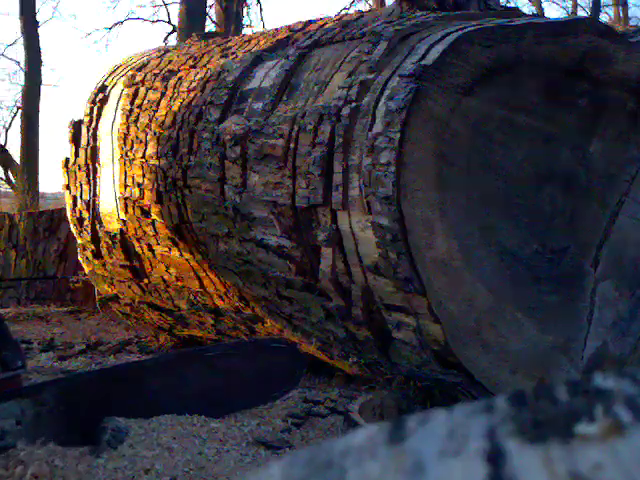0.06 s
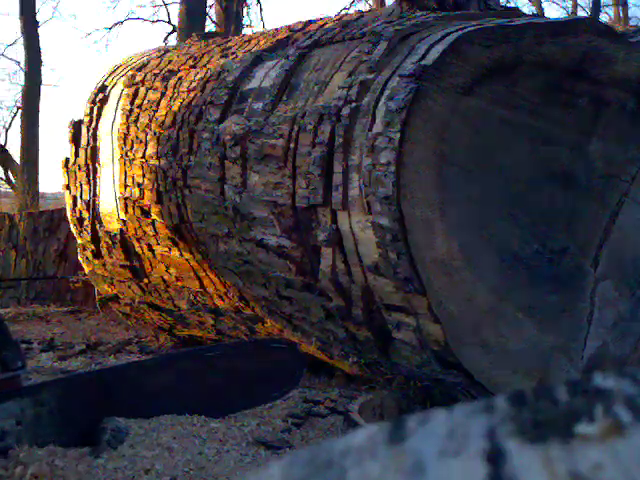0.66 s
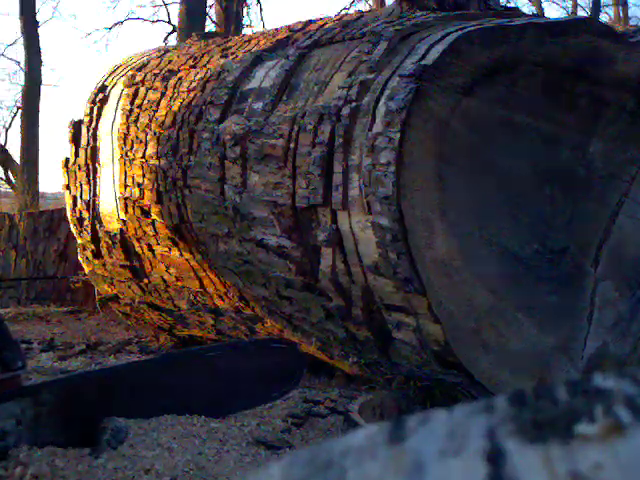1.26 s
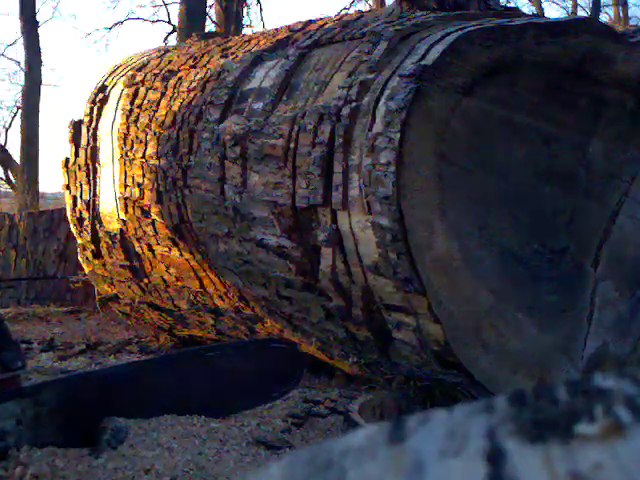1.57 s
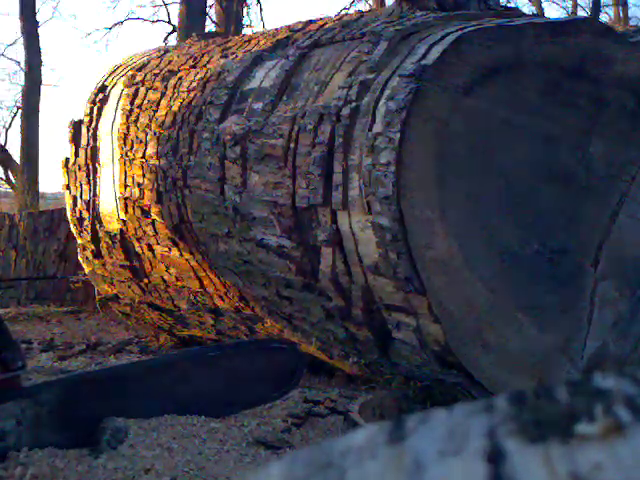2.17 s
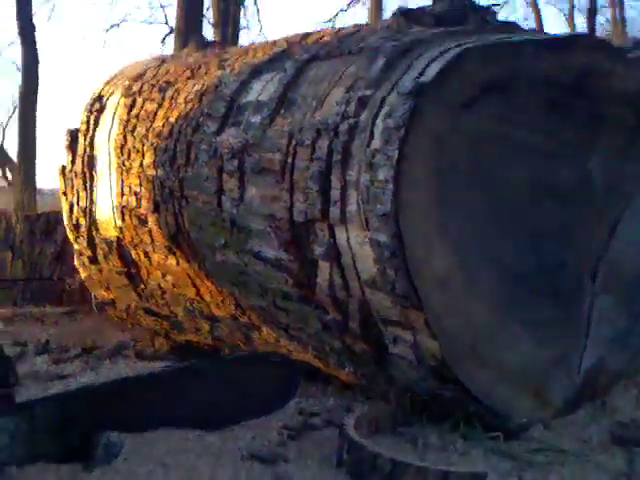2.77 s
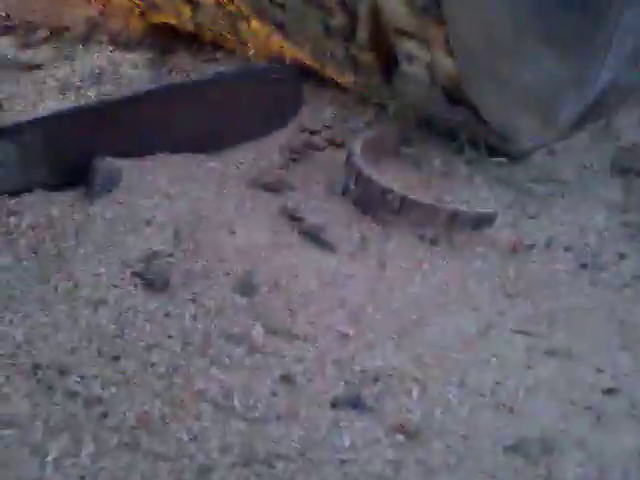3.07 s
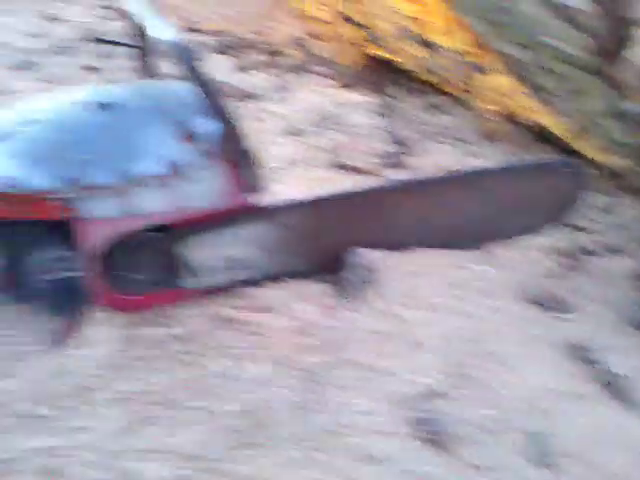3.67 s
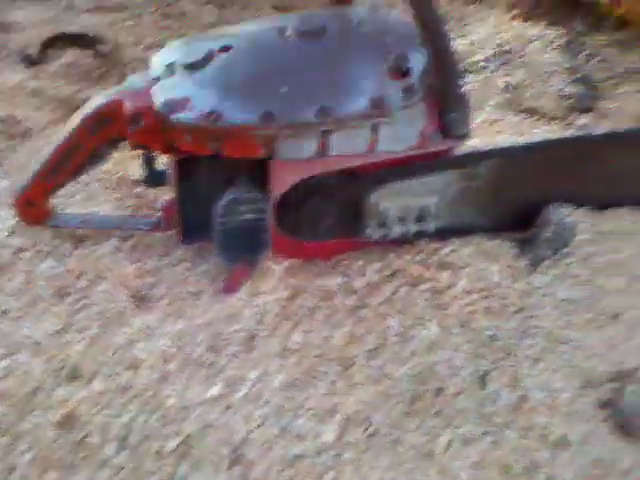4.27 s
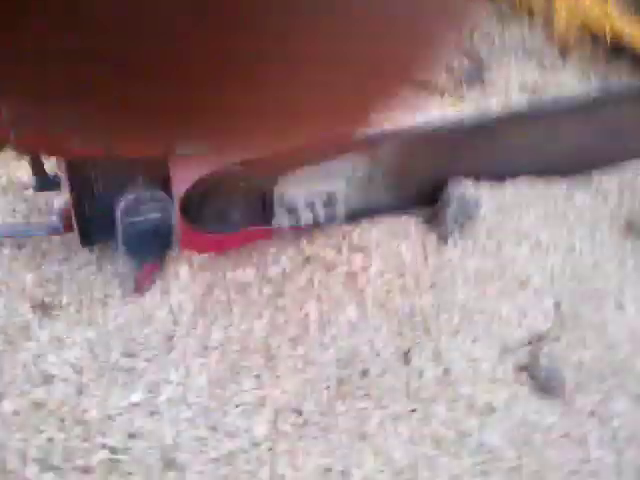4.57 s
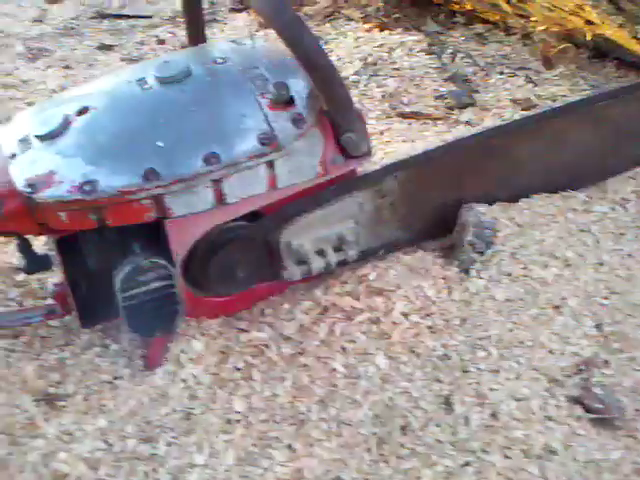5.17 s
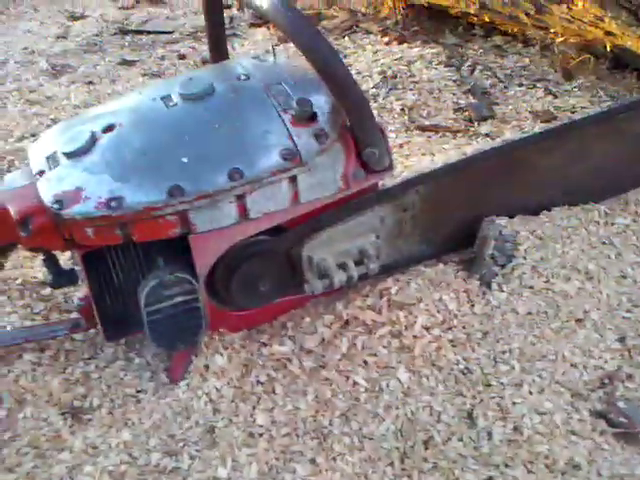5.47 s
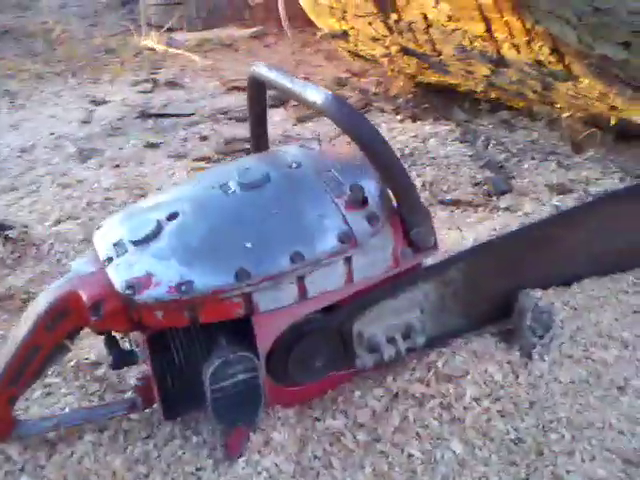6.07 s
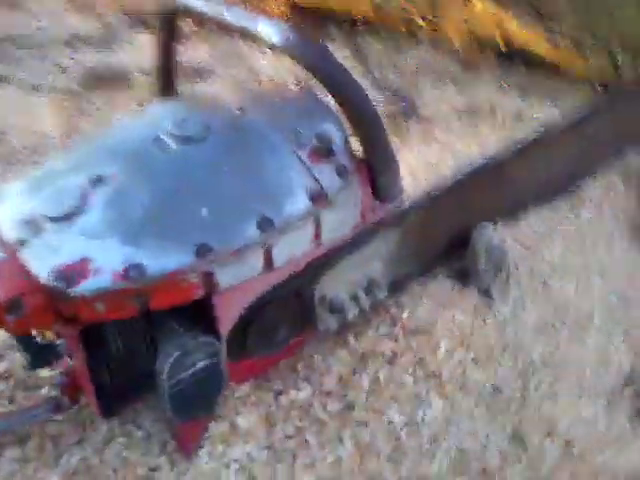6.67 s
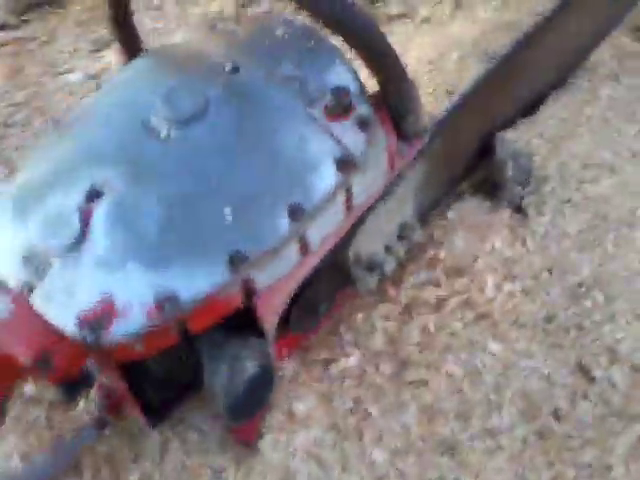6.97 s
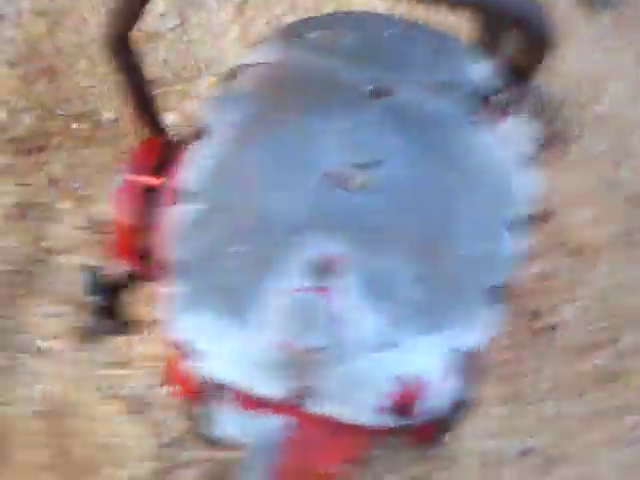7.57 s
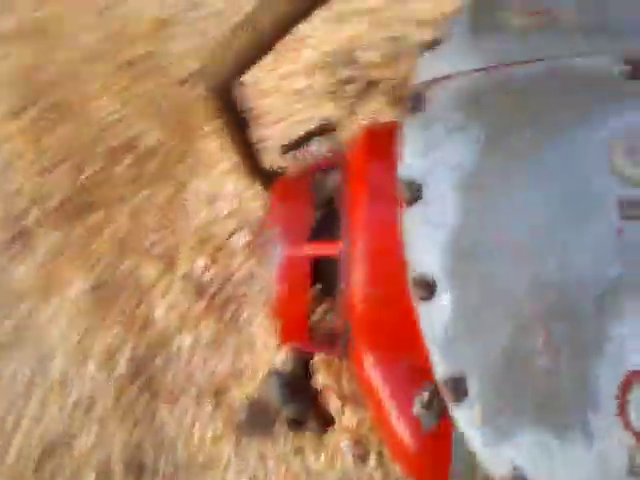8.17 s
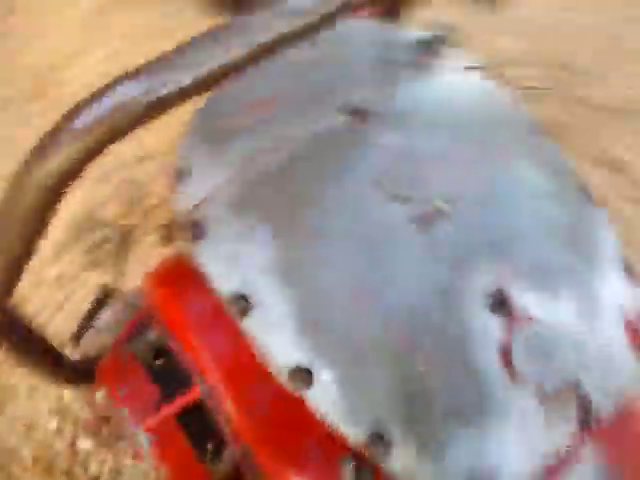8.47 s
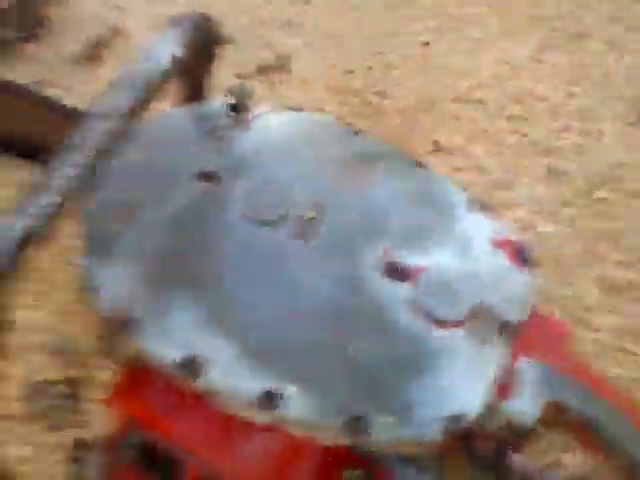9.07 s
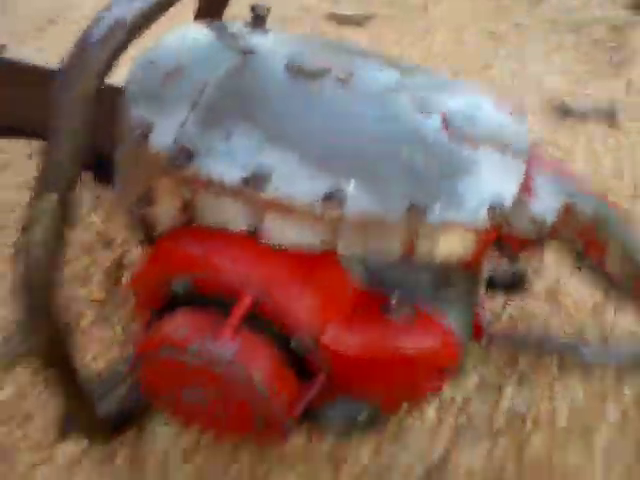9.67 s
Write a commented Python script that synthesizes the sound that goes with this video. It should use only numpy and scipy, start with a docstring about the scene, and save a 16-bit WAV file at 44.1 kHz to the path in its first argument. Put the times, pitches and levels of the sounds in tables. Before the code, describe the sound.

A small two-stroke chainsaw idles outdoors the whole time, a rapid, slightly uneven putter with sharp exhaust cracks and occasional low thuds. A light hiss of chain and cooling air runs between the beats. The hand-held microphone starts with the engine to the left, then moves closer, so the exhaust barks louder and the chain sizzles faintly. Near the end the cracks fade and the engine sounds boomier and hollower.

```python
"""Old chainsaw idling

A two-stroke saw idles on sawdust beside a log while a hand-held mic moves in and over it.
Every turn of the crank fires a bark and a puff out of the muffler; strong and weak burns tend to
alternate, and the hardest crack and thud. Fan and chain hiss between the beats, and the mic's
two close ports are cross-fed into wide stereo."""
import sys
import numpy as np
from scipy import signal
from scipy.fft import rfft, irfft
from scipy.io import wavfile
from scipy.ndimage import uniform_filter1d

SR = 44100
rng = np.random.default_rng(int(sys.argv[2]) if len(sys.argv) > 2 else 0)


def dump(signal):
    """Clip the signal to [-1, 1] and save it as 16-bit WAV at the path in sys.argv[1]."""
    limited = np.clip(np.atleast_2d(signal).T, -1, 1)
    pcm = np.round(limited * 32767).astype(np.int16)
    wavfile.write(sys.argv[1], SR, pcm)


N = 437472
TIME = np.arange(N) / SR

# Table levels are fader rides; each layer adds its own trim.
# the wandering idle: time_s, crank_hz
CRANK_SPEED = [(0, 41.81), (.57, 42.05), (.74, 42.52), (.98, 43.76), (1.38, 43.98), (1.6, 43.33),
               (1.86, 44.69), (2.31, 42.52), (2.65, 44.06), (3.38, 43.95), (3.52, 43.46), (3.78, 44.4),
               (4.02, 44.16), (4.55, 45.64), (4.82, 45.58), (5.01, 45.16), (5.3, 45.66), (5.62, 45.56),
               (5.78, 46.24), (6.22, 45.45), (6.4, 46.08), (6.74, 46.4), (7.14, 46.37), (7.3, 46.95),
               (7.46, 45.44), (7.7, 45.97), (8.02, 45.4), (8.26, 45.48), (9.01, 46.74), (9.46, 46.24),
               (9.62, 46.84), (9.92, 46)]
# the hardest firings: time_s, strength_db, crack_db
BANGS = [(.063, 11.5, -22.5), (.255, 7, -21), (.303, 9, -19.5), (.373, 11, -18), (.492, 10, -17),
         (.516, 12.5, -21), (.565, 6.5, -21), (.636, 11, -23), (.682, 7.5, -22), (.846, 13, -24),
         (.915, 11.5, -18), (.961, 4, -18), (.985, 11.5, -20), (1.031, 10.5, -19), (1.098, 14, -15.5),
         (1.212, 11.5, -17), (1.257, 10, -19), (1.304, 9, -21), (1.327, 5, -24), (1.44, 10, -23),
         (1.509, 5.5, -18.5), (1.577, 11, -21.5), (1.623, 11, -21), (1.694, 9.5, -24), (1.783, 8, -24),
         (1.85, 12.5, -18), (1.897, 6, -21.5), (1.987, 6.5, -23), (2.123, 11, -19), (2.193, 10.5, -26),
         (2.287, 11.5, -20.5), (2.332, 11, -21.5), (2.402, 10.5, -15), (2.495, 11, -14), (2.541, 11, -15),
         (2.655, 10.5, -17), (2.792, 8, -21.5), (2.837, 6, -19.5), (2.882, 10, -21), (2.971, 8.5, -22),
         (3.155, 10.5, -19), (3.201, 12, -20), (3.27, 7.5, -21.5), (3.407, 6.5, -16.5), (3.451, 10.5, -17),
         (3.634, 9, -17), (3.816, 7.5, -20), (4.019, 5, -18), (4.199, 7, -18), (4.266, 7, -21),
         (4.355, 6.5, -20), (4.399, 5.5, -19), (4.53, 5.5, -22), (4.598, 2.5, -20), (4.794, 6, -12.5),
         (4.883, 4, -20.5), (5.236, 4, -18), (5.323, 1.5, -13), (5.542, 4.5, -23), (5.652, 4.5, -13.5),
         (5.717, 4.5, -22), (5.825, 5, -18), (6.109, 7, -13), (6.241, 6, -16.5), (6.372, 6.5, -24),
         (6.566, 4, -19), (6.652, 5.5, -24), (6.695, 5.5, -16.5), (6.739, 4.5, -18), (6.782, 5, -14.5),
         (6.912, 5, -18), (7.019, 4.5, -14.5), (7.128, 0, -12), (7.192, 6.5, -23), (7.256, 6.5, -18.5),
         (7.299, 5.5, -22), (7.364, 5, -19.5), (7.429, 7, -27), (7.472, 7.5, -26), (7.538, 7, -21),
         (7.604, 12, -18.5), (7.691, 8.5, -26), (7.736, 5, -30), (7.757, 10.5, -23), (8.041, 6.5, -27),
         (8.196, 7, -34), (8.35, 8, -41), (8.481, 10.5, -34), (8.525, 6.5, -32), (8.612, 7, -38),
         (8.956, 7.5, -32), (9.623, 7, -37), (9.751, 7.5, -41)]
# blasts that overload the mic: time_s, level_db
THUDS = [(0.062, -29), (0.372, -28), (0.515, -19), (0.635, -23), (1.097, -25), (1.44, -31), (1.576, -24),
         (1.622, -19), (1.692, -29), (1.848, -28), (1.985, -27), (2.494, -20), (2.54, -27), (2.654, -23),
         (3.155, -27), (3.201, -26), (3.45, -25), (4.354, -28), (4.793, -33), (5.322, -23), (5.541, -30),
         (5.651, -29), (5.716, -32), (6.108, -34), (6.371, -30), (6.695, -26), (6.781, -28), (6.911, -22),
         (7.127, -21)]
# the muffler from the moving mic: time_s, puff_db, bark_db, pan_left_db
EXHAUST = [(0, -25.5, -42, 25), (1.7, -25.5, -39, 23), (2.3, -24.5, -35.5, 17.5), (3.3, -21.5, -31.5, 17),
           (4.05, -18.5, -24, 6), (5.3, -18, -24.5, 10), (6.9, -18.5, -19, 3), (7.3, -21, -19.5, 2),
           (8.25, -22.5, -27, -8.5), (8.9, -22.5, -23.5, -2), (9.55, -20, -23.5, -3.5),
           (9.92, -23, -22.5, -2.5)]
# low end of an ordinary turn: time_s, thump_db, scavenge_db
LOW_END = [(0, -39.5, -32), (2.3, -36.5, -35), (3.2, -35, -38.5), (4.5, -38.5, -34.5), (5.8, -38, -33.5),
           (7.2, -34, -28.5), (7.7, -30, -30.5), (8.1, -25.5, -32.5), (8.55, -30.5, -27),
           (9.0, -31.5, -31.5), (9.92, -30.5, -40)]
# intake hum: crank_harmonic, level_db
HUM_PARTIALS = [(2, -60.5), (3, -47.5), (4, -40)]
# the bed between the beats: time_s, chain_db, fan_db
NOISE_BED = [(0, -37, -42.5), (1.1, -34.5, -40.5), (1.49, -32, -41), (1.74, -36.5, -42.5),
             (2.35, -37.5, -39.5), (2.65, -34, -37.5), (4.1, -31, -35.5), (4.6, -33.5, -38.5),
             (5.6, -33, -35.5), (6.1, -31, -31.5), (6.35, -34, -34.5), (6.95, -32.5, -33.5),
             (7.95, -51.5, -35), (9.92, -41, -34)]
# the guide bar rings out as the mic passes it: peak_s, level_db
BAR_SWELLS = [(4.72, -41), (6.1, -40), (6.8, -42), (7.25, -43)]
# the links sizzle as the mic faces them: peak_s, level_db
SIZZLE_SWELLS = [(3.5, -40), (4.1, -37.5), (4.8, -35.5), (5.35, -30.5), (5.85, -33)]
# how far the mic is over the top cover, which shades the muffler: time_s, share
OVERHEAD = [(0, 0), (5.7, 0.06), (7.0, 0.73), (7.6, 0.34), (8.0, 0.99), (8.4, 0.83), (9.0, 0.3),
            (9.35, 0.38), (9.92, 0)]
# the cover's moving notch: time_s, pitch_hz, depth_share
SHADOW_NOTCH = [(6.3, 1020, 0.1), (7.0, 1020, 0.57), (7.7, 1150, .15), (8.2, 1190, .75), (8.55, 1130, 1),
                (9.0, 1160, 0.44), (9.3, 1290, 1), (9.6, 1320, 0), (9.92, 1380, 0)]
# lag of the left side behind the right: pitch_hz, lag_rad
PORT_LAG = [(25, 12.5), (80, 4.5), (170, 0.55), (300, 1.19), (560, -0.2), (950, 0.13), (1300, 0),
            (1600, 0.5), (1900, 2), (2620, 3), (3150, 4.5), (3900, 5.5), (5250, 10.5)]

# EQ curves, all: pitch_hz, gain_db
BARK_EQ = [(30, -33), (300, -42.5), (880, -10), (1040, 5), (1190, 10), (1380, 2), (1560, -13), (1880, -1.5),
           (2250, -17.5), (2650, -48), (3200, -15), (4300, -20.5), (7000, -76)]  # exhaust port, close up
BARK_OVERHEAD_EQ = [(30, -26), (300, -23), (850, -13.5), (1000, -1.5), (1160, -2.5), (1340, 7.5),
                    (1550, -12), (1850, 0.5), (2250, -8), (2600, -7), (3100, -7.5), (3450, -9), (3700, -15),
                    (4300, -22), (7000, -38.5)]  # from above the cover
BARK_REST_EQ = [(30, -50), (300, -37.5), (880, -3.5), (1010, 4.5), (1120, 6), (1260, -4.5), (1420, -31),
                (1750, -6), (2400, -27), (3300, -8), (7000, -56)]  # from beside the log
PUFF_EQ = [(30, -45.5), (90, -33.5), (280, -17), (410, -4), (520, 1), (640, 1), (760, 0.5), (840, -3.5),
           (930, -19), (1400, -27.5), (3000, -60.5)]  # main push of gas
CAN_EQ = [(30, -99), (500, -25), (690, -3.5), (735, -5.5), (785, -7), (880, -26), (930, -17), (968, -14.5),
          (1010, -29.5), (2000, -66.5)]  # ringing muffler can
THUMP_EQ = [(25, -50), (80, -24.5), (130, -8), (200, 1), (280, 2), (400, 6.5), (470, 2.5), (650, -8),
            (1500, -35)]  # weight of a strong burn
SCAVENGE_EQ = [(25, -47), (80, -32), (130, -11), (190, -2), (250, 4), (340, 0), (450, -5), (900, -40)]  # soft pop of scavenging gas
COVER_EQ = [(25, -63.0), (120, -36), (230, 5.0), (22000, 10.5)]  # low cut on the cover's boom
RASP_EQ = [(800, -32), (1500, 6), (1900, 3), (2300, 5), (2750, -19.5), (3150, -2.5), (4200, -12),
           (5500, -24), (14000, -19)]  # gas in the outlet
CRACK_EQ = [(30, 3), (80, 9), (250, -14), (1000, -5), (2000, 5.5), (3500, 4.5), (5200, 1.5), (7000, 6.5),
            (9000, 10), (11000, 6), (14000, 6)]  # snap of a full burn
THUD_EQ = [(25, -24), (60, -9), (100, 4), (160, 6), (280, 9), (450, -18), (800, -23), (2000, -33)]  # overloaded port
SLAP_EQ = [(100, -67), (1200, -4.5), (1900, -7), (2500, -12.5), (3150, 12.5), (3420, 1.5), (3690, 0.5),
           (3950, -8.5), (4500, -5.5), (6000, -30), (14000, -20)]  # piston on the bore
HISS_EQ = [(1500, -9.5), (2700, -27), (4000, -3), (4600, 0), (5200, -6.5), (6500, 0), (7800, 4.5),
           (9000, 5), (10600, 4.5), (12000, 3.5), (14000, -1)]  # chain in its groove
BAR_EQ = [(4500, -50), (5550, -15), (5880, 0), (6130, 0), (6450, -12), (8000, -50)]  # ringing guide bar
SIZZLE_EQ = [(3900, -36), (4550, 1), (5100, -3), (7000, -22), (8200, -4), (9150, 5), (9600, 1), (10100, -5),
             (10900, -28), (11800, -3), (12300, 2), (12900, -10), (14000, -16)]  # chain links
FAN_EQ = [(25, -4), (60, -2), (130, 0), (220, 4.5), (350, 10), (700, 7), (1300, -0.5), (2000, 3.5),
          (2600, 5.5), (3400, 0), (4400, -8), (6000, -8.5), (14000, -14)]  # cooling air
SIDE_EQ = [(200, -1), (900, -1.5), (1150, -3.5), (1310, -11), (1500, -0.5), (1800, 2), (3400, -1.5),
           (3900, -2), (4400, 0)]  # dips the cross-feed cuts in the stereo difference

SPENT_GAS, BURN_RANGE = .4, (-1.2, .75)  # share of a burn taken off the next; weakest, strongest
IDLE_HZ, BASE_STRENGTH_DB, SWING_DB, SWING_DB_PER_HZ = 45.2, 1.82, 5.5, 0.5
CRACK_DB, CRACK_FALL_DB, CRACK_SPREAD_DB = -23.5, 5.5, 2.5  # base, loss on weaker burns, scatter
POP_EARLY_S_PER_DB = .0006  # a stronger burn pops sooner
# the mic lifts from beside the log, and later crosses to where the saw's body shades the cracks
LIFT_S, CROSS_S, FAR_SIDE_DB = (1.6, 2.4), (7.37, 8.7), -26
# a point on the pan curve: the bark starts far left with the puff, then moves to the middle sooner
PUFF_PAN_REF_DB, BARK_PAN_REF_DB = 11, 2
# the cover's boom: (mic at rest, mic lifted)
COVER_DB, COVER_HZ, COVER_WIDTH_HZ = (-32.5, -48), (333, 378), (39, 98)


def muffler(times, strength_db):
    """The opening port barks; the main puff follows and leaves the can ringing."""
    puff_db, bark_db, _, _ = perspective(times)
    can_db, _, puff_pan, bark_pan = perspective(TIME)
    over = follow(OVERHEAD, TIME)[0]
    lifted = np.interp(TIME, LIFT_S, [0, 1])
    opening = push(times - .0036, bark_db + 0.6 * strength_db + .5, rough=0.25, eddy_s=0.00092)
    bark = colour(opening * lifted * np.sqrt(1 - over), BARK_EQ)
    bark += colour(opening * lifted * np.sqrt(over), BARK_OVERHEAD_EQ)
    bark += colour(opening * (1 - lifted) * amp(6.5), BARK_REST_EQ)
    blow = push(times - .0016, puff_db + 0.49 * strength_db + 1.24, rough=0.15, eddy_s=0.0034)
    puff = colour(blow, PUFF_EQ) * amp(-1.0)
    can = colour(blow * amp(1.03 * can_db + 8.0), CAN_EQ)
    return place(bark, bark_pan) + place(puff + can, puff_pan)


def firings(turns, jitter_s=0.00014):
    """Time, strength and crack of each turn: a strong burn leaves spent gas that weakens the next."""
    times = np.interp(np.arange(int(turns[-1]) + 1), turns, TIME)
    luck, late, snap = rng.standard_normal((len(times), 3)).T
    bang_s, bang_db, bang_crack_db = np.transpose(BANGS)
    hard = abs(times - bang_s[:, None]).argmin(1)
    luck[hard - 1], luck[hard] = -1, 1  # a weak turn sets up the bang
    burn = np.clip(signal.lfilter([1], [1, SPENT_GAS], luck), *BURN_RANGE)
    # a slow engine burns less evenly
    swing_db = SWING_DB + SWING_DB_PER_HZ * (IDLE_HZ - follow(CRANK_SPEED, times)[0])
    strength_db = BASE_STRENGTH_DB + swing_db * burn
    crack_db = CRACK_DB - CRACK_FALL_DB * (1 - burn) + CRACK_SPREAD_DB * snap
    crack_db += np.interp(times, CROSS_S, [0, FAR_SIDE_DB])
    strength_db[hard], crack_db[hard] = bang_db, bang_crack_db
    return times + jitter_s * late, strength_db, amp(crack_db)


def low_pulses(times, strength_db, rough=.22):
    """A strong burn thumps and booms the cover; a weak one trails a soft pop of scavenging gas."""
    thump_db, scavenge_db = follow(LOW_END, times)
    thump = push(times - .0016, thump_db + 1.17 * strength_db, rough, eddy_s=0.00068)
    pop_times = times + .0018 - POP_EARLY_S_PER_DB * strength_db
    pop = push(pop_times, scavenge_db - 0.71 * strength_db, rough, eddy_s=0.0025)
    lows = colour(thump, THUMP_EQ) + colour(pop, SCAVENGE_EQ) + cover_boom(times, strength_db, rough)
    return place(lows, perspective(TIME)[2])


def cover_boom(times, strength_db, rough, overhead_db=21):
    """Each burn shakes the top cover: a narrow note from the log, broad close up, loudest overhead."""
    level_db = np.interp(times, LIFT_S, COVER_DB) + overhead_db * follow(OVERHEAD, times)[0]
    shake = push(times - .0018, level_db + 0.59 * strength_db, rough, eddy_s=0.0021)
    boom = resonate(shake, np.interp(TIME, LIFT_S, COVER_HZ), np.interp(TIME, LIFT_S, COVER_WIDTH_HZ))
    return colour(boom, COVER_EQ)


def exhaust_jet(times, strength_db, crack):
    """Gas rasps through the outlet on each turn; a full burn tops it with a short-tailed crack."""
    rasp_db = 0.68 * perspective(times)[1] + 1.74 * strength_db - 16.5
    rasp = bursts(times - .0012, amp(rasp_db), rise_s=0.0021, fall_s=0.0026)
    snap = bursts(times - .0011, crack * amp(5.0), rise_s=0.0017, fall_s=0.00075)
    tail = bursts(times, crack * amp(-9.5), rise_s=0.00084, fall_s=0.0056)
    outlet = place(colour(rasp * port_noise(), RASP_EQ), 3.5 * perspective(TIME)[3])
    return outlet + colour((snap + tail) * port_noise(), CRACK_EQ)


def thuds():
    """Direct blasts overload one mic port: a low thud, out of phase between the sides."""
    times, level_db = np.transpose(THUDS)
    blast = push(times - .0005, level_db + 4.5, rough=0.98, eddy_s=0.0016)
    return place(colour(blast, THUD_EQ), pan_db=1.5) * [[1], [-1]]


def crankcase(turns, times):
    """The piston slaps the bore and the casing knocks, over a soft buzz, drone and intake hum."""
    bark_db = perspective(times)[1]
    drone_db, buzz_db, puff_pan, bark_pan = perspective(TIME)
    slap_luck, knock_luck = rng.standard_normal((2, len(times)))
    slap = push(times - .0037, 0.061 * bark_db - 34.5 + 1.6 * slap_luck, rough=0.47, eddy_s=0.0029)
    knock = push(times + .005005, bark_db - 7.5 + 0.69 * knock_luck, rough=0.083, eddy_s=0.0018)
    buzz = amp(buzz_db - 16) * rng.standard_normal(N)
    clatter = colour(slap, SLAP_EQ) + colour(knock + buzz, BARK_EQ)
    drone = colour(amp(drone_db - 18) * rng.standard_normal(N), PUFF_EQ)
    hum = intake_hum(turns, times) * amp(0.37 * (buzz_db - buzz_db.mean()))
    return place(clatter, bark_pan) + place(drone + hum, puff_pan)


def intake_hum(turns, times, spread=.3):
    """Low crank harmonics that waver, as no two turns draw the same air."""
    draw = 1 + spread * np.interp(TIME, times, rng.standard_normal(len(times)))
    phase = 2 * np.pi * (turns - .2)
    return draw * sum(amp(db) * np.sqrt(2) * np.cos(k * phase) for k, db in HUM_PARTIALS)


def chain(ticks_per_s=260, flutter_db=2.0, bar_floor_db=-51):
    """The loose chain hisses, sizzles and ticks in its groove and rings the bar."""
    tick_times = TIME[rng.random(N) < ticks_per_s / SR]
    ticks = bursts(tick_times, rng.exponential(1, len(tick_times)), rise_s=0.00024, fall_s=0.0017)
    flutter = amp(flutter_db * unit(uniform_filter1d(rng.standard_normal(N), size=2500)))
    scrape = unit(flutter * (1 + 0.4 * ticks)) * port_noise(cross=0.16)
    hiss = scrape * amp(follow(NOISE_BED, TIME)[0] + 4.0)
    bar = scrape * (amp(bar_floor_db) + swells(BAR_SWELLS, width_s=.28))
    sizzle = port_noise(cross=0.24) * unit(1 + ticks) * swells(SIZZLE_SWELLS, width_s=.32)
    return colour(hiss, HISS_EQ) + colour(bar, BAR_EQ) + colour(sizzle, SIZZLE_EQ)


def fan(turns):
    """A bed of rushing air, pulsing faintly with the crank."""
    rush = port_noise() * (1 + 0.025 * np.cos(2 * np.pi * turns))
    return colour(rush * amp(follow(NOISE_BED, TIME)[1] + 4.5), FAN_EQ)


def perspective(at):
    """What the mic's position sets, in dB: puff level, bark level, puff pan, bark pan."""
    puff_db, bark_db, pan_db = follow(EXHAUST, at)
    return puff_db, bark_db, pan_db, BARK_PAN_REF_DB * (pan_db / PUFF_PAN_REF_DB) ** 3


def shadow(x, width_hz=110):
    """Paths round both sides of the cover cancel in a notch that sweeps as the mic moves."""
    hz, depth = follow(SHADOW_NOTCH, TIME)
    carrier = np.exp(2j * np.pi * np.cumsum(hz) / SR)
    pole = np.exp(-np.pi * width_hz / SR)
    band = (carrier * signal.lfilter([1 - pole], [1, -pole], x / carrier)).real
    return x - 2 * depth * band


def widen(pair):
    """The cross-fed ports twist the sides out of phase, mostly in the bass and treble."""
    twist = np.exp(.5j * follow(PORT_LAG, np.fft.rfftfreq(N, 1 / SR))[0])
    return irfft(rfft(pair) * np.array([1 / twist, twist]), N)


def port_noise(cross=1.0, gap_s=.000377):
    """Wide noise: each mic port subtracts a delayed share of the other."""
    ports = rng.standard_normal((2, N))
    return unit(ports - cross * np.roll(ports[::-1], round(gap_s * SR), 1))


def push(times, level_db, rough, eddy_s, pulse_s=.011):
    """Sharp pushes of gas, each with a short turbulent wake."""
    heights = amp(level_db) * np.sqrt(pulse_s * SR)
    wake = bursts(times, heights, eddy_s / 2, eddy_s) * rng.standard_normal(N) / np.sqrt(eddy_s * SR)
    return clicks(times, heights) + rough * wake


def clicks(times, heights):
    """One click at each time."""
    at = np.round(times * SR).astype(int)
    inside = (at >= 0) & (at < N)
    return np.bincount(at[inside], heights[inside], N)


def bursts(times, heights, rise_s, fall_s):
    """An envelope that swells up to each time and dies away after it."""
    t = np.arange(-SR // 20, SR // 20 + 1) / SR
    shape = np.exp(-abs(t) / np.where(t < 0, rise_s, fall_s))
    return signal.oaconvolve(clicks(times, heights), shape, "same")


def swells(rows, width_s):
    """A fade up and down around each cue."""
    return sum(amp(db) * np.exp(-((TIME - s) / width_s) ** 2) for s, db in rows)


def resonate(x, hz, width):
    """A resonance whose centre and width may drift."""
    carrier = np.exp(2j * np.pi * np.cumsum(hz) / SR)
    poles = np.exp(-np.pi * np.array([width.min(), width.max()]) / SR)
    narrow, wide = [signal.lfilter([np.sqrt(2 * (1 - r ** 2))], [1, -r], x / carrier) for r in poles]
    share = (width - width.min()) / (np.ptp(width) + 1e-9)
    return (carrier * ((1 - share) * narrow + share * wide)).imag


def colour(x, eq, size=4096):
    """Plays x through a minimum-phase EQ of energy 1."""
    hz, db = np.transpose(eq)
    log_hz = np.log(np.fft.rfftfreq(size, 1 / SR) + 1)
    cepstrum = irfft(np.log(amp(np.interp(log_hz, np.log(hz), db))))
    cepstrum[1:size // 2] *= 2
    cepstrum[size // 2 + 1:] = 0
    ring = irfft(np.exp(rfft(cepstrum)))[:size // 2]
    return signal.oaconvolve(np.atleast_2d(x), ring[None] / np.linalg.norm(ring), axes=1)[:, :N]


def place(x, pan_db):
    """Constant-power pan; positive is left."""
    gains = amp(np.array([pan_db, -pan_db]).reshape(2, -1) / 2)
    return x * gains / np.sqrt(np.mean(gains ** 2, 0))


def follow(rows, at):
    """Reads a table's curves at the given points."""
    axis, *columns = np.transpose(rows)
    return [np.interp(at, axis, c) for c in columns]


def amp(db):
    """Decibels to gain."""
    return 10 ** (np.asarray(db) / 20)


def unit(x):
    """Scales to rms 1."""
    return x / np.sqrt(np.mean(x ** 2) + 1e-20)


def scene():
    """The mix: one crank drives the engine's beats, over chain and fan."""
    turns = np.cumsum(follow(CRANK_SPEED, TIME)[0]) / SR - .642  # opens partway through a turn
    times, strength_db, crack = firings(turns)
    engine = muffler(times, strength_db) + low_pulses(times, strength_db) + crankcase(turns, times)
    return widen(shadow(engine)) + exhaust_jet(times, strength_db, crack) + thuds() + chain() + fan(turns)


def record(dry):
    """The mic colours the stereo difference, flips polarity, rounds off peaks and cuts the top."""
    side_gain = amp(follow(SIDE_EQ, np.fft.rfftfreq(N, 1 / SR))[0])
    mid = dry.mean(0)
    side = irfft(rfft(dry[0] - dry[1]) / 2 * side_gain, N)
    pair = -np.array([mid + side, mid - side])
    rounded = pair / (1 + pair ** 6) ** (1 / 6)
    high_cut = signal.firwin(255, cutoff=14150, window=("kaiser", 8), fs=SR)
    return signal.oaconvolve(rounded, high_cut[None], "same")


dry = scene()
out = record(dry)
dump(out)
```